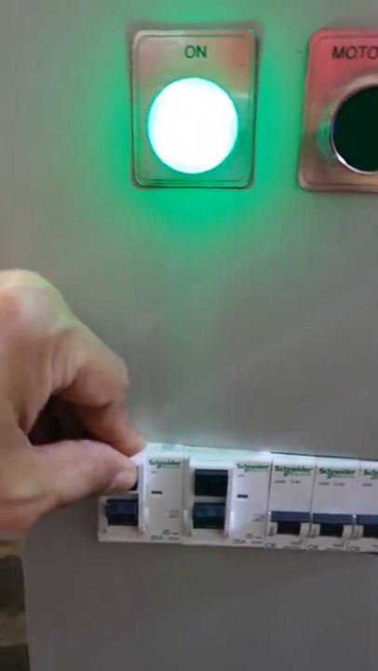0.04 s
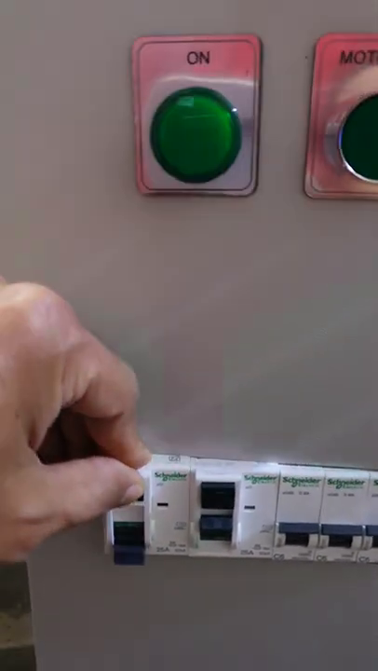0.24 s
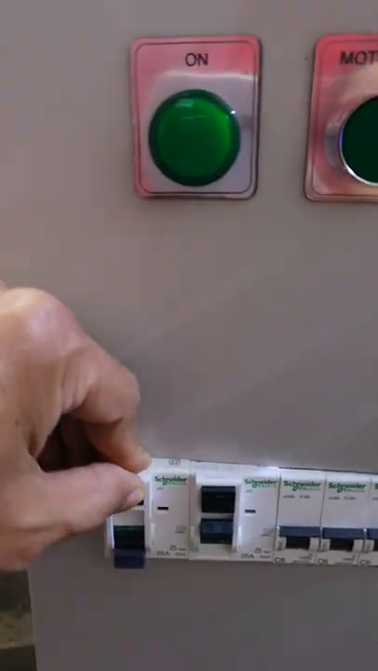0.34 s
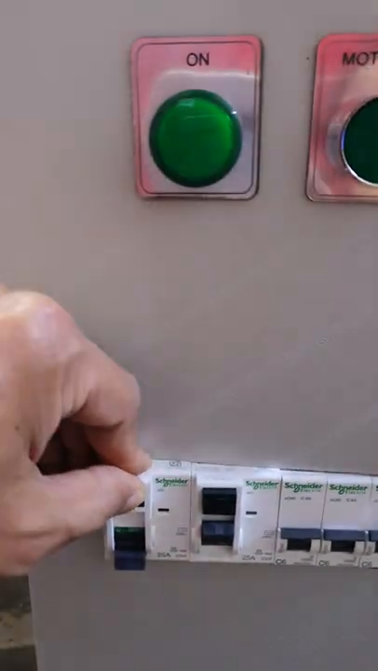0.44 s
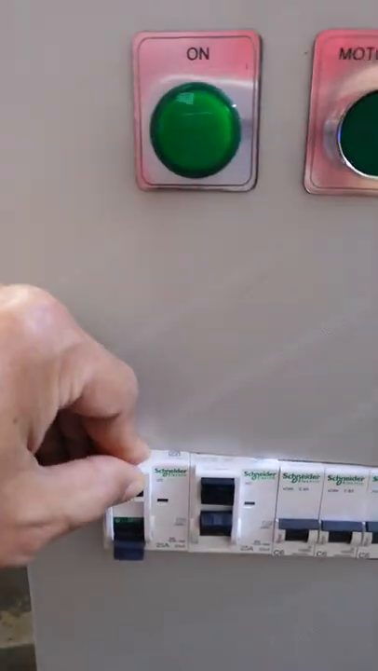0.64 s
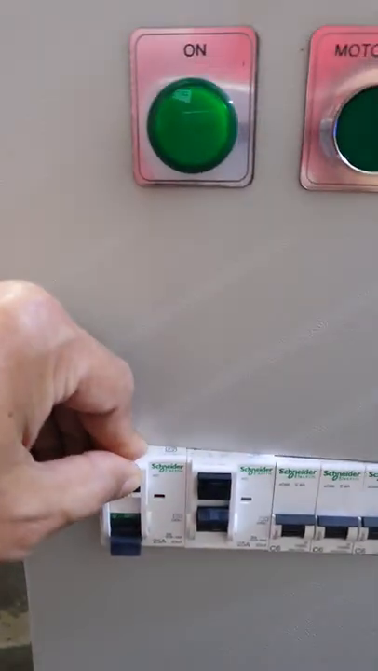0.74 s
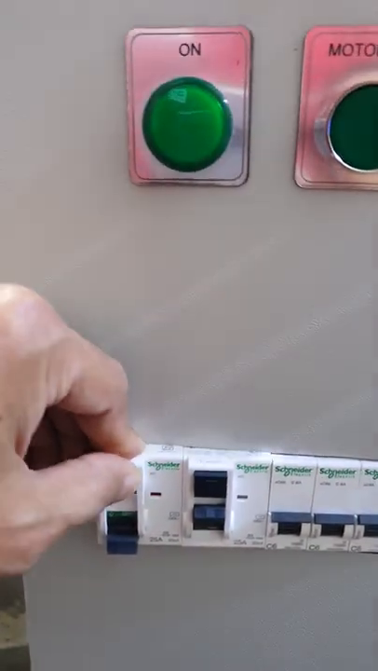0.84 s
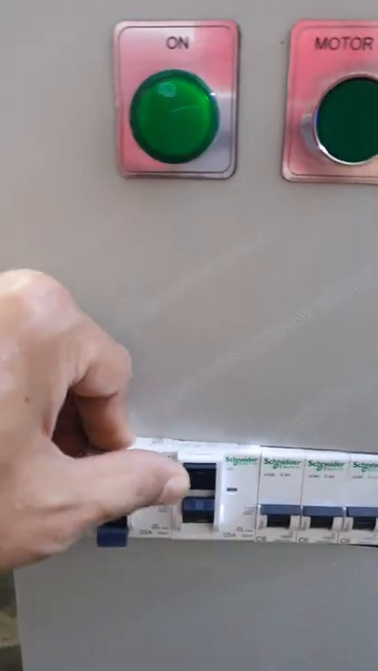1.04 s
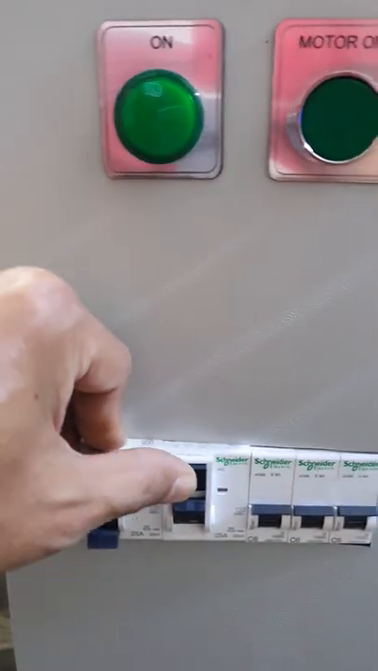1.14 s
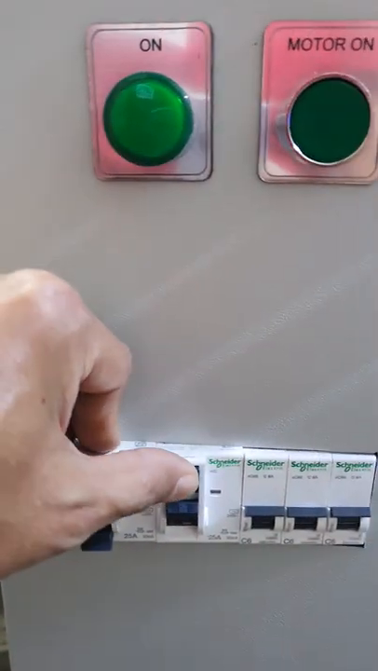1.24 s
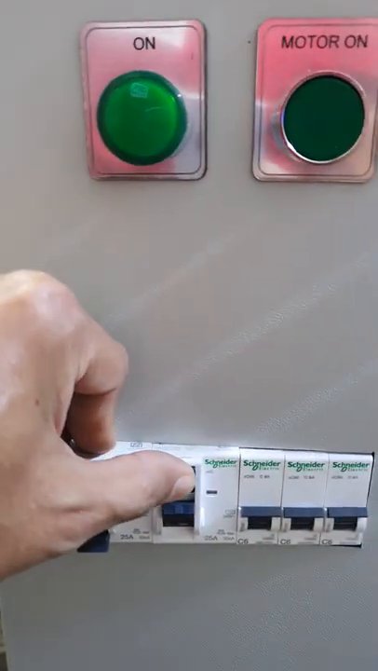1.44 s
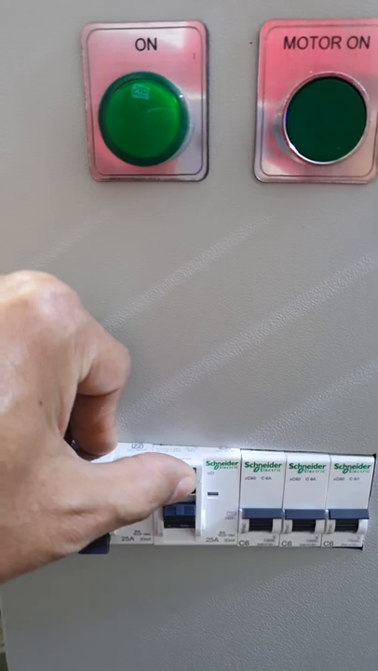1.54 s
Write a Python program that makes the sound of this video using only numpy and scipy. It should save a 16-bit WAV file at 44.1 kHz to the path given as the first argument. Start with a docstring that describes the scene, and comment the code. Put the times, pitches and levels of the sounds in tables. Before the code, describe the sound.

A breaker toggle snaps over with a loud sharp clack on a booming steel cabinet, then one faint tick

```python
"""Faint, wavering equipment whine over low room rumble; then a breaker toggle snaps over on a steel cabinet.
Latch, lever and contacts are shaped noise bursts within about 10 ms; decaying sines ring the plastic case.
Low sines swell and die as the cabinet booms; a near wall echoes and banded noise reverberates in a hard room.
Later a finger gives the toggle one light tick with a tiny rebound: softer, shorter noise bursts."""
import sys
import numpy as np
from scipy import signal
from scipy.fft import rfft, irfft
from scipy.io import wavfile
from scipy.ndimage import uniform_filter1d

SR = 44100
rng = np.random.default_rng(int(sys.argv[2]) if len(sys.argv) > 2 else 0)


def wav_record(signal):
    """Record a signal, one row per channel, as 16-bit PCM in the file named by sys.argv[1]."""
    frames = np.transpose(np.atleast_2d(signal))
    bounded = np.clip(frames, -1, 1)
    # unit amplitude maps onto the largest positive 16-bit level
    quanta = np.round(bounded * 32767).astype(np.int16)
    wavfile.write(sys.argv[1], SR, quanta)


N = 70560
SIDES = np.array([[1], [-1]])  # left, right


def undb(db):
    """Decibels to amplitude gain."""
    return 10 ** (np.asarray(db) / 20)


def along(points, hz, column=1):
    """Interpolate a table column on a log-frequency axis."""
    p = np.array(points, float)
    return np.interp(np.log(np.maximum(hz, 1)), np.log(p[:, 0]), p[:, column])


def colour(x, points):
    """Minimum-phase filter with the given (Hz, dB) curve, by folding the cepstrum."""
    size = 2 * N
    hz = np.fft.rfftfreq(size, 1 / SR)
    cepstrum = irfft(np.log(undb(along(points, hz))))
    cepstrum[1:N] *= 2
    cepstrum[N + 1:] = 0
    response = np.exp(rfft(cepstrum))
    return irfft(rfft(x, size) * response)[..., :N]


def since(start_s):
    """Seconds since a moment, zero before it."""
    return np.maximum(np.arange(N) / SR - start_s, 0)


def fade(t, t60_s):
    """Exponential decay, -60 dB at t60_s."""
    return np.exp(-np.log(1000) * t / t60_s)


def late(x, delay_s):
    """Delay both channels."""
    k = int(np.clip(delay_s * SR, 0, N - 1))
    return np.pad(x, ((0, 0), (k, 0)))[:, :N]


def unit(x):
    """Scale to a mean channel energy of one."""
    return x / np.sqrt(np.sum(x ** 2) / 2)


def walk(rate_hz):
    """Slow random wavering: random levels joined by straight ramps."""
    k = int(SR / rate_hz)
    steps = np.repeat(rng.standard_normal(N // k + 1), k)
    return uniform_filter1d(steps, k)[:N]


ALIKE_BELOW_HZ = 380


def diffuse():
    """Spectrum of diffuse noise at two microphones: alike in the bass, unrelated above."""
    hz = np.fft.rfftfreq(N, 1 / SR)
    alike = .97 / (1 + (hz / ALIKE_BELOW_HZ) ** 4)
    mid, side = rfft(rng.standard_normal((2, N)))
    return hz, mid * np.sqrt(1 + alike) + side * np.sqrt(1 - alike) * SIDES


# room background colour: f/Hz, relative density/(dB per Hz)
RUMBLE_COLOUR = [(20, -35), (55, -7), (95, 4.5), (115, -8), (140, -4), (300, -15), (430, -14), (650, -14.5),
                 (1150, -19), (1400, -22), (1900, -15.5), (3100, -19.5), (4200, -32.5), (6500, -44),
                 (7600, -50.5), (12000, -47), (15500, -55)]
RUMBLE_RMS_DB = -56.5
# lower-midrange background, RMS envelope: t/s, level/dB
LOW_MID_ENVELOPE = [(0, -74.5), (.75, -76.5), (.92, -65), (1.05, -61), (1.17, -63.5), (1.3, -72.5),
                    (1.46, -59.5), (1.6, -64.5)]
# lower-midrange background colour: f/Hz, relative density/(dB per Hz)
LOW_MID_COLOUR = [(120, -27.5), (190, -9), (245, 4.5), (310, -19), (400, -5), (480, -4), (600, -15.5),
                  (780, -14.5), (1300, -37), (4000, -66.5)]


def background():
    """Diffuse noise: low rumble and soft machine hiss, plus a lower midrange that swells and dips."""
    times_s, levels_db = np.array(LOW_MID_ENVELOPE).T
    low_mid_db = np.interp(since(0), times_s, levels_db)
    out = 0
    for points, rms_db in ((RUMBLE_COLOUR, RUMBLE_RMS_DB), (LOW_MID_COLOUR, low_mid_db)):
        hz, noise = diffuse()
        x = irfft(noise * undb(along(points, hz)), N)
        out = out + undb(rms_db) * x / x.std()
    return out


# hum and whine partials: f/Hz, RMS level at first, middle, last place/dB, left minus right/dB
WHINE_PARTIALS = [(137.5, -70, -68, -68, 5), (411.9, -86.5, -78.5, -68, 4.5),
                  (1115, -72.5, -76.5, -76.5, 10.5), (1621, -72, -76.5, -83, 1.5),
                  (2146, -68.5, -69, -66, -8), (2236, -74, -73.5, -70, 14),
                  (2666, -68.5, -71.5, -73.5, -6.5), (2776, -61.5, -64.5, -72, -0.5),
                  (3250, -76.5, -81, -81, 3), (3467, -80, -82.5, -79, -1)]
# leave first place, reach middle, leave middle, reach last: t/s
PLACE_TIMES_S = (0.149, .65, 1.1, 1.35)
WHINE_WAVER_DB, MIC_SPREAD_TURNS = .6, .12


def whine():
    """Running equipment: steady sines whose levels shift as the microphones move among standing waves."""
    t, out = since(0), 0
    half = SIDES / 2
    for hz, first_db, middle_db, last_db, pan_db in WHINE_PARTIALS:
        place_db = np.interp(t, PLACE_TIMES_S, (first_db, middle_db, middle_db, last_db))
        db = place_db + WHINE_WAVER_DB * walk(9)
        tone = np.sin(2 * np.pi * (hz * t + rng.random() + half * MIC_SPREAD_TURNS))
        out = out + np.sqrt(2) * undb(db + half * pan_db) * tone
    return out


# room reverberation: f/Hz, relative density/(dB per Hz), T60/s
ROOM_DECAY = [(40.5, -19, .9), (90, -5, 0.94), (180, -2, 0.75), (300, -2.5, 0.76), (480, -2.5, .5),
              (700, -6.5, 0.53), (1200, 2.5, 0.28), (1600, -4.5, 0.42), (2620, -5.5, 0.45),
              (3970, -3.5, 0.36), (7010, -12, .39), (7600, -18.5, .33), (11500, -13.5, .29),
              (15570, -27, .26)]
ROOM_LAG_S, ROOM_BUILD_S, LATE_BELOW_HZ = 0.0025, 0.011, 130


def room(points):
    """Reverberation of a click in the given colour; half-octave bands decay separately, bass builds late."""
    hz, noise = diffuse()
    noise = noise * undb(along(points, hz))
    t, out = since(0), 0
    place = np.clip(2 * np.log2(np.maximum(hz, 1) / 32), 0, 18)  # band position, half octaves above 32 Hz
    for k in range(19):
        centre_hz = 32 * 2 ** (k / 2)
        band = irfft(noise * np.maximum(1 - abs(place - k), 0), N)
        build_s = ROOM_BUILD_S * (1 + (LATE_BELOW_HZ / centre_hz) ** 2)
        build = 1 - np.exp(-t / build_s)
        out = out + band * build * fade(t, along(ROOM_DECAY, centre_hz, 2))
    return late(unit(out), ROOM_LAG_S)


CRACK_DB = 12.5  # gain added to every strike and touch


def crack(points, t60_s):
    """Contact noise: a decaying noise burst, coloured, of unit energy."""
    burst = rng.standard_normal((2, N)) * fade(since(0), t60_s)
    return unit(colour(burst, points))


# light touch of the toggle and its rebound: t/s, level/dB
TOUCH_TIMES = [(0.8734, -37.5), (0.8753, -49)]
# colour of a light touch: f/Hz, relative density/(dB per Hz)
TOUCH_COLOUR = [(500, -42), (1500, -8), (2300, -4), (3600, -6), (4500, -4), (5500, -5.5), (7000, -8.5),
                (7700, -23), (9800, -18), (11500, -30), (15500, -32)]
TICK_T60_S, TICK_ROOM_DB = .009, -6


def ticks():
    """A finger nudges the toggle: tiny noise clicks, each with its reverberation."""
    out = 0
    for s, db in TOUCH_TIMES:
        click = crack(TOUCH_COLOUR, TICK_T60_S) + undb(TICK_ROOM_DB) * room(TOUCH_COLOUR)
        out = out + undb(db + CRACK_DB) * late(click, s)
    return out


# low modes of the cabinet and the air around it: f/Hz, level/dB, swell/s, T60/s
CABINET_MODES = [(54.4, -40.5, .12, 1.96), (114.4, -29.5, 0.06, 0.37), (173.34, -15.5, 0.054, 0.1),
                 (165.8, -23.5, 0.039, 0.54), (211.2, -27, .03, 0.99), (262, -32.5, 0.022, .5),
                 (344, -34, .06, 0.58), (401.2, -32.5, .06, 0.61), (462.5, -36, .03, 0.35),
                 (592.7, -37, .025, 0.64)]
CABINET_LAG_S, CABINET_PAN_DB = .004, 2.5


def cabinet():
    """The jolt spreads through the steel box: low modes swell, then ring out."""
    t, out = since(STRIKES[0][0] + CABINET_LAG_S), 0
    for hz, db, swell_s, t60_s in CABINET_MODES:
        swell = np.sqrt(np.minimum(t / swell_s, 1))
        decay = fade(np.maximum(t - swell_s, 0), t60_s)
        out = out + undb(db) * swell * decay * np.sin(2 * np.pi * hz * t)
    return out * undb(SIDES * CABINET_PAN_DB / 2)


# strikes inside the breaker: t/s, level/dB, treble tilt/(dB per octave)
STRIKES = [(0.2144, -10, -1.5), (0.2161, -5, 4), (0.2173, -7, 3.5), (0.2188, -1, 0.5), (0.2212, -8, -2),
           (0.2242, -10, -1)]
# bare strike colour: f/Hz, relative density/(dB per Hz)
STRIKE_COLOUR = [(200, -17.5), (600, -11.5), (1200, -3), (2500, 3.5), (4500, -7.5), (6800, -1.5),
                 (7700, -16.5), (9500, -10.5), (12000, -13), (15500, -18.5)]
# modes of the plastic case and the springs inside: f/Hz, level/dB, T60/s
CASE_MODES = [(768, -29, 0.22), (947.5, -29.5, 0.42), (1214.5, -14, .09), (1636, -29, 0.013),
              (1862, -16.5, .06), (2495, -19.5, .08), (2784, -35, .4), (3080, -18, 0.064),
              (3380, -26.5, 0.099), (3780, -32, 0.3), (4262, -47.5, .35), (5240, -20, .05),
              (5540, -21, 0.049), (6785, -32, .04), (12100, -30.5, .02)]
CRACK_T60_S, CASE_BUILD_S = 0.016, 0.0023
WALL_LAG_S, WALL_DB, WALL_TOP_HZ = .0225, -8.5, 2216
ROOM_DB = 13.5


def breaker():
    """Successive strikes crack, case modes ring, a near wall echoes them dully and the room answers."""
    t, out = since(STRIKES[0][0]), 0
    for s, db, tilt_db in STRIKES:
        tilted = [(f, d + tilt_db * np.log2(f / 3000)) for f, d in STRIKE_COLOUR]  # pivot 3 kHz
        out = out + undb(CRACK_DB + db) * late(crack(tilted, CRACK_T60_S), s)
    for hz, db, t60_s in CASE_MODES:
        ring = (1 - np.exp(-t / CASE_BUILD_S)) * fade(t, t60_s)
        phase_turns = rng.random() + .4 * rng.random((2, 1))
        out = out + undb(db) * ring * np.sin(2 * np.pi * (hz * t + phase_turns))
    wall_lowpass = signal.butter(2, WALL_TOP_HZ, fs=SR, output="sos")
    echo = undb(WALL_DB) * late(signal.sosfilt(wall_lowpass, out), WALL_LAG_S)
    reverb = undb(ROOM_DB) * late(room(ROOM_DECAY), STRIKES[1][0])
    return out + echo + reverb


# right microphone response to clack and tick, duller on top: f/Hz, level re left/dB
RIGHT_MIC_RESPONSE = [(100, 3.5), (400, 3.5), (1200, -3), (2400, 1.5), (5500, 0), (6600, -3.5), (7600, -18),
                      (12000, -10.5), (15500, -11.5)]


def scene():
    """Clack and tick at two microphones, over cabinet boom, whine and room."""
    left, right = breaker() + ticks()
    clack = np.array([left, colour(right, RIGHT_MIC_RESPONSE)])
    return clack + cabinet() + whine() + background()


CEILING, TOP_HZ = .8, 15600


def record(dry):
    """Soft saturation rounds the highest peaks; a steep elliptic low-pass cuts the top."""
    rounded = dry / (1 + (dry / CEILING) ** 4) ** .25
    lowpass = signal.ellip(10, .2, 80, TOP_HZ, fs=SR, output="sos")  # 0.2 dB ripple, 80 dB stopband
    return signal.sosfilt(lowpass, rounded)


dry = scene()
out = record(dry)
wav_record(out)
```